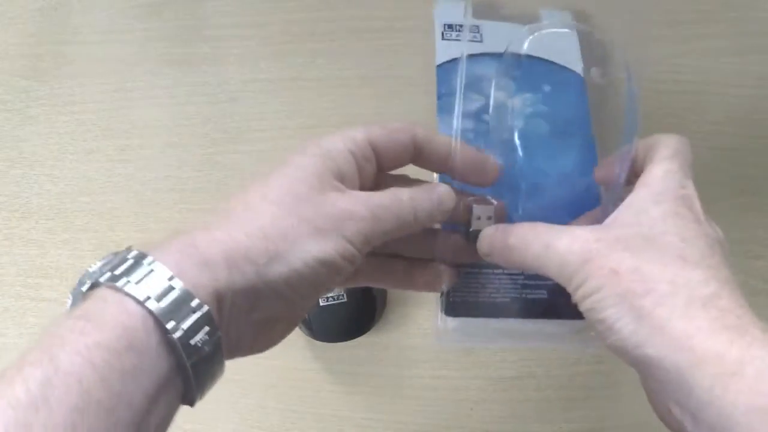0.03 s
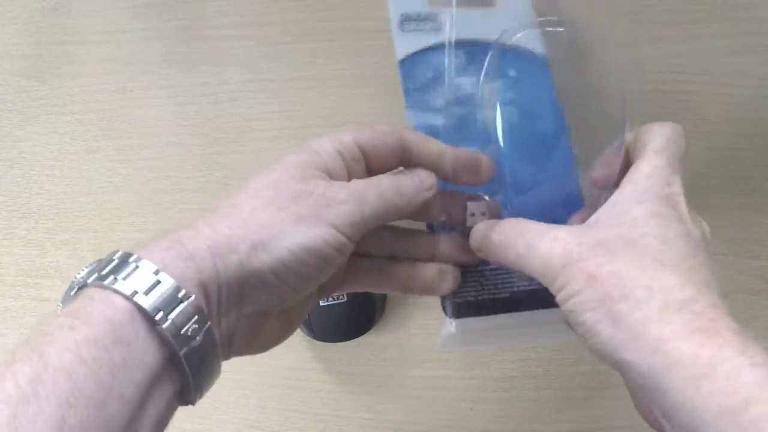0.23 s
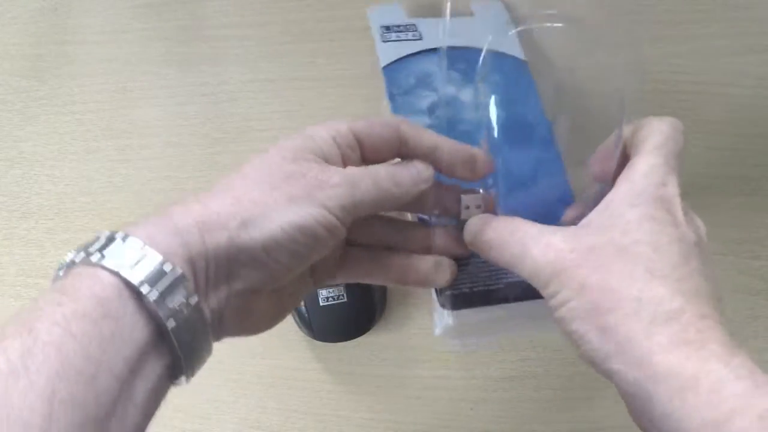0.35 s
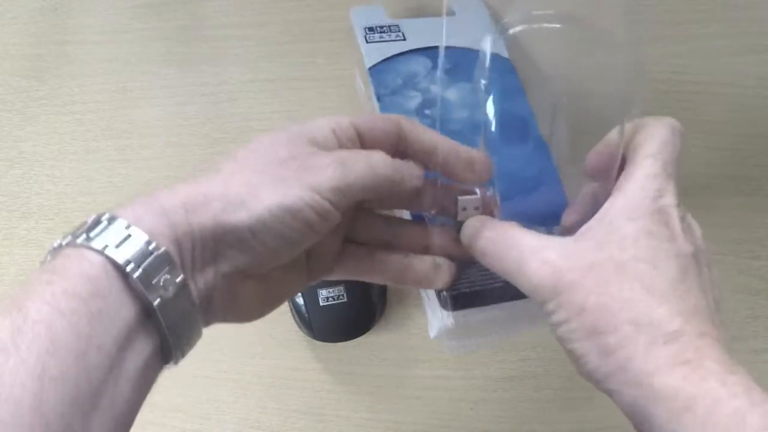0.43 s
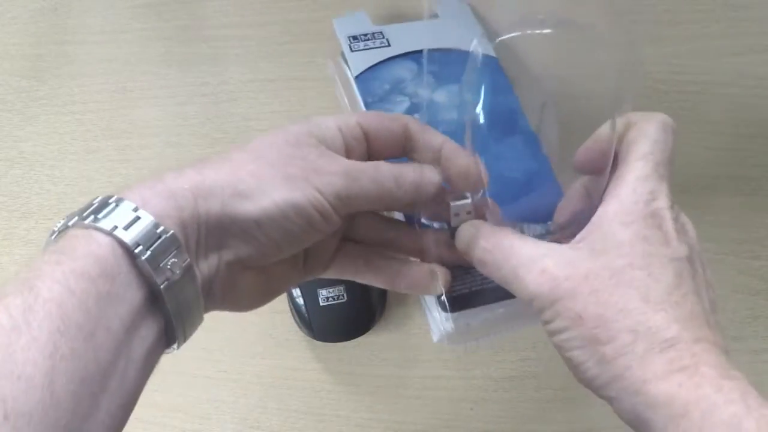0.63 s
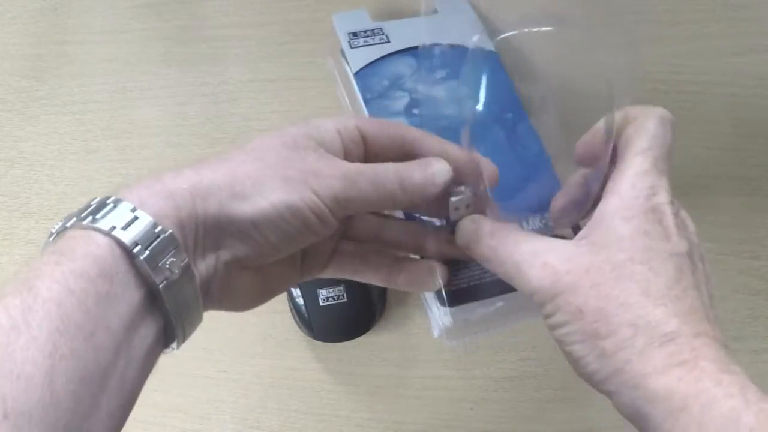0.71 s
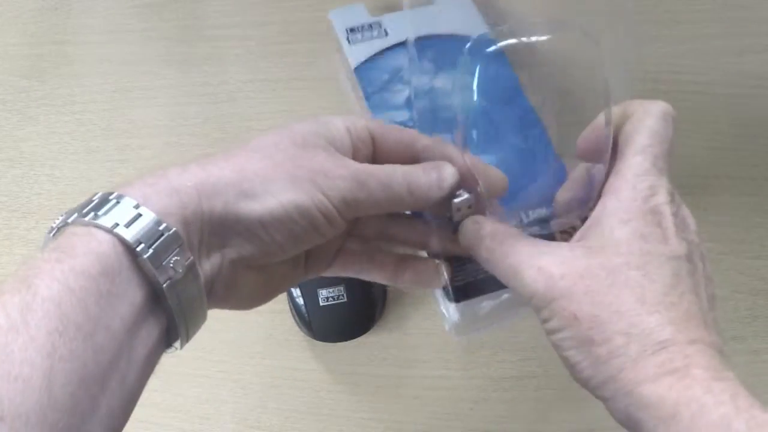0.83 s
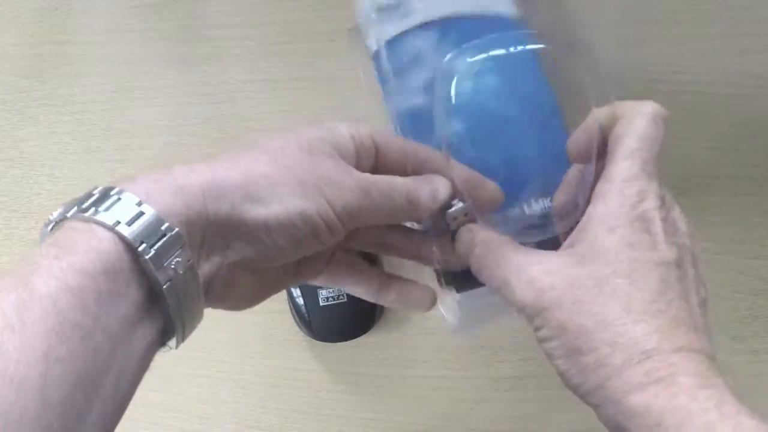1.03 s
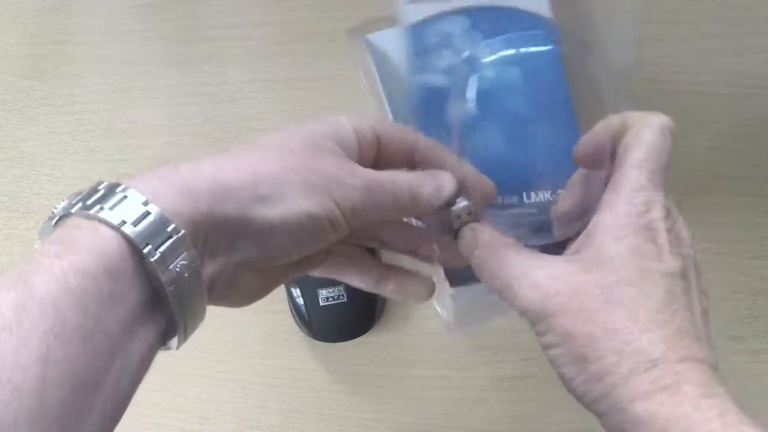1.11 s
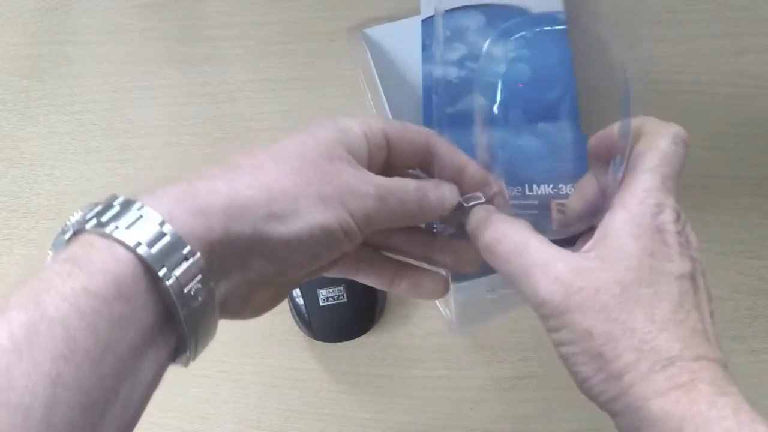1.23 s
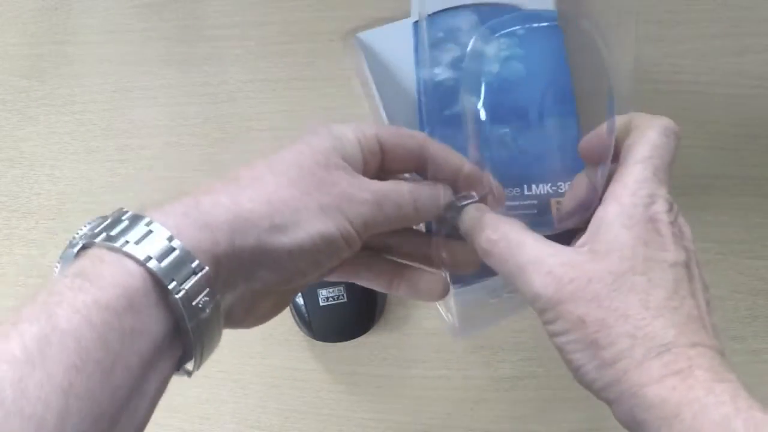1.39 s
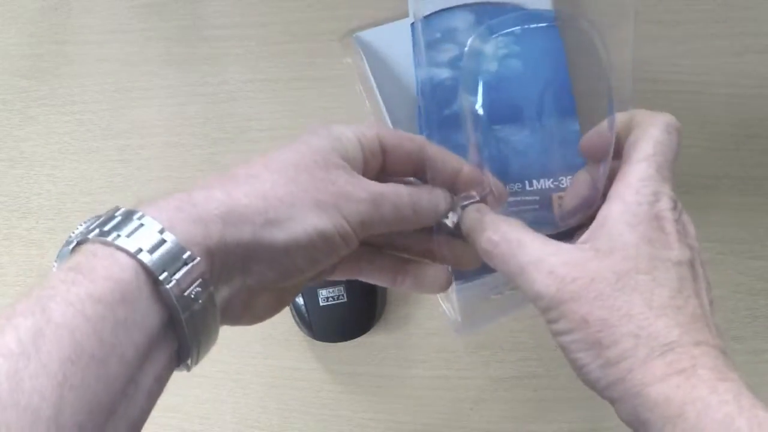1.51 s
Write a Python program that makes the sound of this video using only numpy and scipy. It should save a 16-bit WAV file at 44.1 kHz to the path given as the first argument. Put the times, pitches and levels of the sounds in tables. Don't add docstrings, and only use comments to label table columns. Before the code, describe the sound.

A stiff plastic blister pack pops and crackles in irregular bursts as hands prise it apart, with brief rubbing and soft thuds on a wooden desk, close microphone in a small furnished room.

```python
import sys
import numpy as np
from scipy import signal
from scipy.fft import rfft, irfft
from scipy.io import wavfile

SR = 44100
rng = np.random.default_rng(int(sys.argv[2]) if len(sys.argv) > 2 else 0)


def boost(x):
    u = np.asarray(x, float) / 20
    return 10 ** u


def pcm_store(signal):
    levels = np.round(np.clip(np.atleast_2d(signal), -1, 1) * 32767)
    wavfile.write(sys.argv[1], SR, levels.astype(np.int16).T)


N = 68355
MODE_SCATTER_DB = 2.0


def at_hz(points, hz):
    table_hz, value = np.transpose(points)
    return np.interp(np.log(hz), np.log(table_hz), value, left=-90, right=-90)


def rms_one(x):
    return x / np.sqrt(np.mean(x ** 2) + 1e-20)


def colour(x, spectrum):
    hz = np.arange(len(x) // 2 + 1) * SR / len(x) + 1e-3
    return rms_one(irfft(rfft(x) * boost(at_hz(spectrum, hz)), len(x)))


def follow(points):
    return boost(np.interp(np.arange(N) / SR, *np.transpose(points)))


def ring(force, hz, t60):
    r = boost(-60 / (t60 * SR))
    w = 2 * np.pi * hz / SR
    return signal.lfilter([0, np.sin(w)], [1, -2 * r * np.cos(w), r * r], force + 1e-18)


def cut(x, hz, kind, order=4):
    return signal.sosfilt(signal.butter(order, hz, kind, fs=SR, output="sos"), x)


# t/s, middle modes level/dB, first hollow mode level/dB, second hollow mode level/dB,
# tilt of the middle modes/(dB per octave)
BUCKLES = [(0.01, -53, -74, -59, 32), (0.016, -49.5, -67, -52, -8.5), (0.11, -63, -82, -94, 35),
           (0.171, -57.5, -55, -56.5, -21), (0.239, -32, -28.5, -24, 11), (0.276, -37, -30.5, -61, 17),
           (0.283, -41.5, -35.5, -88, -7), (0.317, -46, -40.5, -42.5, -4), (0.329, -44, -36.5, -45, -9),
           (0.471, -51, -45.5, -60, 14), (0.499, -48.5, -47, -58, 13), (0.5115, -33.5, -34.5, -44.5, 6.5),
           (0.707, -45, -36, -45.5, 21), (0.737, -55, -45, -52, 10), (0.764, -31.5, -42.5, -25.5, 11),
           (0.976, -45.5, -50.5, -54, 8), (1.035, -60, -45, -50.5, -2), (1.055, -35, -50, -75, -3),
           (1.07, -45, -42, -45, -18), (1.097, -40.5, -35.5, -50, -18.5), (1.188, -40, -42.5, -69, 8),
           (1.195, -65, -43, -54, 13), (1.224, -31, -26.5, -39.5, 6), (1.521, -42, -61, -91, 8)]
# f/Hz, level/dB, t60/s
HOLLOW = [(364.4, 0, 0.062), (660.7, -1, 0.055), (496, -1.5, 0.021)]
# f/Hz, level/dB, t60/s
MIDDLE = [(765, -19, 0.0094), (983, 9, 0.024), (1040, -8.5, 0.0063), (1250, 3.5, 0.008), (1536, -4, 0.013)]
HOLLOW_DB, MIDDLE_DB = 1, -5.5
BUCKLE_LAG_S = 0.00066
CONTACT_HZ, SHELL_LOW_HZ = 2260, 243


def buckles():
    s, middle, first, second, tilt = np.transpose(BUCKLES)
    start = ((s + BUCKLE_LAG_S) * SR).astype(int)
    levels = [level + HOLLOW_DB for level in (first, second, (first + second) / 2)]
    levels += [middle + MIDDLE_DB + tilt * np.log2(hz / 1200) for hz, _, _ in MIDDLE]
    out = np.zeros(N)
    for k, ((hz, db, t60), level) in enumerate(zip(HOLLOW + MIDDLE, levels)):
        scatter = MODE_SCATTER_DB * rng.standard_normal(len(s))
        pushes = np.bincount(start, boost(level + db + scatter), N)
        out += (-1) ** (k // 3) * ring(pushes, hz, t60)
    return cut(cut(out, CONTACT_HZ, "low"), SHELL_LOW_HZ, "high")


# t/s, f/Hz, level/dB, t60/s
PANELS = [(.2400, 1013, -26, 0.015), (.2400, 1442, -29.5, 0.044), (.2405, 2375, -33, 0.026),
          (.2425, 1980, -40, .03), (.243, 2990, -40, .02), (.2765, 1610, -25.5, 0.012),
          (.2765, 2590, -36, 0.021), (.277, 5530, -35, 0.018), (.283, 2570, -32.5, 0.021),
          (.3195, 1600, -34, 0.036), (.3285, 1540, -37, 0.026), (.319, 4240, -49, 0.016),
          (.5122, 630, -37, 0.023), (.5122, 2370, -26.5, 0.013), (.5125, 4290, -28.5, 0.0099),
          (.514, 1690, -29, 0.012), (.519, 3240, -35.5, 0.021), (.526, 2950, -33, 0.02),
          (.7365, 890, -34, 0.029), (.7365, 1450, -37.5, 0.032), (.7652, 4170, -26, 0.0094),
          (.7652, 2360, -32, 0.013), (.766, 2810, -33, .012), (.7715, 2036, -32.5, 0.038),
          (.7725, 3940, -30.5, 0.012), (.7725, 2840, -36, 0.022), (.789, 2060, -42, 0.021),
          (1.035, 890, -34.5, 0.029), (1.035, 1730, -47, 0.038), (1.070, 2130, -30, 0.011),
          (1.073, 2930, -29.5, 0.024), (1.0958, 2090, -27, .012), (1.097, 2700, -24.5, 0.026),
          (1.1045, 2640, -31.5, .025), (1.096, 4740, -28.5, 0.03), (1.098, 6130, -27, .012),
          (1.112, 2920, -42, 0.022), (1.2248, 793, -24, 0.024), (1.2252, 4240, -23.5, .012),
          (1.226, 1610, -28.5, 0.031), (1.227, 2956, -32, 0.021), (1.2255, 2160, -37, 0.0066),
          (1.232, 5120, -36.5, 0.016), (1.240, 4020, -40, 0.027), (1.321, 1700, -43.5, 0.012),
          (1.321, 940, -45, 0.019), (1.5215, 1070, -58, 0.033), (1.5215, 2950, -44, 0.02),
          (.481, 297, -39.5, 0.018), (.486, 1010, -54, 0.022)]
PANEL_RISE_S = 0.00026


def panels():
    t = np.arange(4096) / SR
    out = np.zeros(N + len(t))
    for k, (s, hz, db, t60) in enumerate(PANELS):
        shape = (1 - np.exp(-t / PANEL_RISE_S)) * boost(db - 60 * t / t60)
        start = int(s * SR)
        out[start:start + len(t)] += (-1) ** k * shape * np.sin(2 * np.pi * hz * t)
    return out[:N]


# t/s, rim modes level/dB, edge modes level/dB, bright snap level/dB, length/s
SNAPS = [(0.111, -72, -59.5, -70, 0.0019), (0.171, -55, -80, -70, 0.003), (0.196, -75, -63, -79, .002),
         (0.241, -35.5, -54, -69, 0.0023), (0.2760, -30, -30, -52, 0.0021), (0.2835, -50, -48, -64, 0.0035),
         (0.514, -35.5, -32.5, -68, 0.0026), (0.711, -67, -50.5, -66, .002),
         (0.766, -30, -33.5, -104, 0.0024), (1.19, -39.5, -42, -60, 0.00054),
         (1.192, -41, -41.5, -54, 0.002), (1.224, -33, -28.5, -70, 0.0041),
         (1.323, -42.5, -46.5, -60, 0.0029), (1.522, -41, -39.5, -66, 0.0014)]
# t/s, rim modes level/dB, edge modes level/dB, bright snap level/dB, length/s
TEARS = [(0.013, -45, -87, -73, 0.0018), (0.0183, -68, -50, -55.5, 0.0037),
         (0.241, -41.5, -37, -54, 0.0096), (0.315, -50, -59, -72, 0.007), (0.331, -47, -48, -73, 0.0039),
         (0.473, -58, -52, -60.5, 0.011), (0.502, -58, -54, -77, 0.019), (0.704, -49, -62, -83, 0.0081),
         (0.9734, -50.5, -50, -62.5, 0.0083), (1.036, -41, -38.5, -53.5, 0.0088),
         (1.053, -35, -28, -40, 0.0065), (1.072, -38.5, -27.5, -39, 0.0032),
         (1.0954, -32.5, -33, -36.5, 0.0017), (1.106, -47, -35, -38, 0.0075), (1.386, -47, -50, -75, 0.018),
         (1.421, -62, -62, -75, 0.0045)]
# f/Hz, level/dB, t60/s
RIM = [(1850, -3, 0.005), (2300, -1, 0.005), (2750, 1, 0.005), (3200, -1, 0.005)]
# f/Hz, level/dB, t60/s
EDGE = [(3650, -4, 0.004), (4040, -1, 0.004), (4400, -1, 0.004), (4800, -2, 0.004)]
# f/Hz, level/dB, t60/s
TIPS = [(5370, -4, 0.0033), (5970, -3.5, 0.0039), (6540, -9.5, 0.0045), (6950, -12, 0.0061)]
RIM_DB, EDGE_DB, TIPS_DB = -1, -1.5, 10.5
TIPS_FOLLOW = 0.56
SLIP_RISE_S = 0.00016
SNAP_LOW_HZ, SNAP_DB = 6500, 16
SHELL_HIGH_HZ = 7200


def crackle():
    s, rim, edge, snap, length = np.transpose(SNAPS + TEARS)
    t = np.arange(2048) / SR
    decay_s = np.clip(length, .0003, .015)[:, None]
    unevenness = np.repeat(rng.standard_normal((len(s), 64)), 32, axis=1)
    slips = rng.standard_normal((len(s), len(t))) * boost(3 * unevenness)
    slips *= np.exp(-t / decay_s) * (1 - np.exp(-t / SLIP_RISE_S))
    where = ((s * SR).astype(int)[:, None] + np.arange(len(t))).ravel()

    def place(rows, db):
        gain = boost(db) / np.linalg.norm(rows, axis=1)
        return np.bincount(where, (rows * gain[:, None]).ravel(), N + len(t))[:N]

    modes = [(mode, rim + RIM_DB) for mode in RIM]
    modes += [(mode, edge + EDGE_DB) for mode in EDGE]
    modes += [(mode, edge + TIPS_DB + TIPS_FOLLOW * (snap - edge)) for mode in TIPS]
    body = np.zeros(N)
    for (hz, db, t60), level in modes:
        scatter = MODE_SCATTER_DB * rng.standard_normal(len(s))
        rung = cut(ring(slips, hz, t60), 1.25 * hz, "low", order=2)
        longer_db = 10 * np.log10(t60 * SR / 28)
        body += place(rung, level + db + scatter + longer_db)
    body = cut(cut(body, 1540, "high"), SHELL_HIGH_HZ, "low")
    return body + place(cut(slips, SNAP_LOW_HZ, "high"), snap + SNAP_DB)


# t/s, level/dB
RUB = [(0, -67), (.02, -69), (.1, -75.5), (.29, -73), (.325, -47), (.37, -67), (.44, -72), (.48, -62.5),
       (.6, -82), (.72, -80), (.9, -80), (.99, -79), (1.03, -71), (1.11, -52.5), (1.2, -59), (1.33, -69),
       (1.4, -70), (1.55, -83)]
# f/Hz, level/dB
RUB_COLOUR = [(88, -72), (150, 2), (631, -4), (751, 8), (1240, -1.5), (1570, -26), (2020, -16.5),
              (4650, -2.5), (15500, -31.5)]
RUB_GRAINS_PER_S, RUB_SPREAD_DB = 6000, 3.0
SQUEAK_S, SQUEAK_LENGTH_S, SQUEAK_HZ, SQUEAK_DB = .338, .028, 2480, -53


def rubbing():
    happens = rng.random(N) < RUB_GRAINS_PER_S / SR
    size = boost(RUB_SPREAD_DB * np.minimum(rng.exponential(1, N), 4))
    grains = happens * size * rng.choice([-1, 1], N)
    progress = np.clip((np.arange(N) / SR - SQUEAK_S) / SQUEAK_LENGTH_S, 0, 1)
    sing = rms_one(ring(rng.standard_normal(N), SQUEAK_HZ, 0.04)) * np.sin(np.pi * progress)
    return follow(RUB) * colour(grains, RUB_COLOUR) + boost(SQUEAK_DB) * sing


# t/s, peak level/dB, f/Hz
BUMPS = [
    (0.279, -31, 303),
    (0.462, -35, 335),
    (0.512, -38.5, 278),
    (0.739, -44.5, 197),
    (.703, -32, 166),
    (1.099, -44.5, 300),
    (1.226, -41, 304),
]
BUMP_CYCLES, BUMP_RISE_S, BUMP_SAG_S = 1.47, 0.0036, 0.0045


def bumps():
    out, t = np.zeros(N), np.arange(N) / SR
    for s, db, hz in BUMPS:
        age = np.maximum(t - s, 0)
        sag = BUMP_SAG_S * (1 - np.exp(-age / BUMP_SAG_S))
        turns = hz * (0.38 * age + 0.57 * sag)
        swell = (1 - np.exp(-age / BUMP_RISE_S)) ** 2
        decay = np.exp(-2.5 * age * hz / BUMP_CYCLES)
        out += boost(db + 18) * swell * decay * np.sin(2 * np.pi * turns)
    return out


# f/Hz, t60/s
ROOM_T60 = [(150, 0.31), (400, 0.35), (1000, 0.26), (2800, 0.32), (7000, 0.13), (14000, 0.11)]
ROOM_DB, ROOM_BUILD_S = -5, 0.00043
FIRST_ECHO_S, FIRST_ECHO_DB = .0075, -17


def room(x):
    t = np.arange(SR // 2) / SR
    edges = 100 * 2 ** np.arange(0, 7.6, .5)
    tail = np.zeros(len(t))
    for lo, hi in zip(edges, edges[1:]):
        t60 = at_hz(ROOM_T60, np.clip(np.sqrt(lo * hi), 160, 13000))
        band = signal.butter(2, [lo, hi], "band", fs=SR, output="sos")
        tail += signal.sosfilt(band, rng.standard_normal(len(t))) * boost(-60 * t / t60)
    tail *= 1 - np.exp(-(t / ROOM_BUILD_S) ** 2)
    tail *= boost(ROOM_DB) / np.linalg.norm(tail)
    tail[int(FIRST_ECHO_S * SR)] += boost(FIRST_ECHO_DB)
    return signal.fftconvolve(x, tail)[:N]


# t/s, level/dB
STRAIN = [(0, -3), (.1, 0.5), (.2, -9.5), (.3, 5.5), (.4, 5.5), (.5, 4), (.6, -6), (.8, 0), (.95, -4),
          (1.06, 1.5), (1.17, 6.5), (1.268, -2), (1.4, -4), (1.55, -6)]
# f/Hz, level/dB
RUMBLE = [(12, -9), (25, -10), (45, -3.5), (62, -2.5), (85, -13.5), (130, -23), (200, -57)]
# f/Hz, level/dB
FLOOR = [(65, -118), (110, -2), (262, -7), (366, 1), (542, -8.5), (872, -13), (2780, -22), (14000, -35),
         (15500, -35)]
RUMBLE_DB, FLOOR_DB = -59, -65


def background():
    rumble = follow(STRAIN) * colour(rng.standard_normal(N), RUMBLE)
    hiss = colour(rng.standard_normal(N), FLOOR)
    return boost(RUMBLE_DB) * rumble + boost(FLOOR_DB) * hiss


BUCKLE_WET_DB, PANEL_WET_DB, CRACKLE_WET_DB = -6, -9, 3


def scene():
    hollow, single, cracks, rub = buckles(), panels(), crackle(), rubbing()
    near = hollow + single + cracks + rub
    far = boost(BUCKLE_WET_DB) * hollow + boost(PANEL_WET_DB) * single + boost(CRACKLE_WET_DB) * cracks + rub
    return (near + room(far) + bumps() + background())[None]


def roll_off(x):
    return signal.sosfilt(signal.butter(12, 15830, fs=SR, output="sos"), x)


def record(dry):
    mix = cut(dry, 15100, "low", order=12)
    mix = cut(mix, 15600, "low", order=24)
    return roll_off(mix)


dry = scene()
out = record(dry)
pcm_store(out)
```